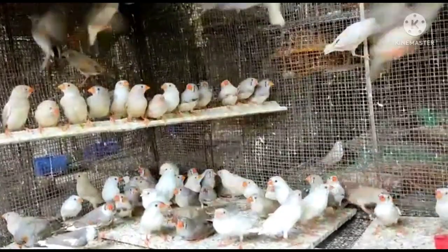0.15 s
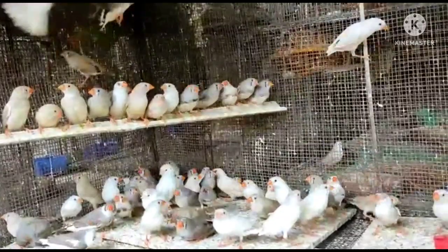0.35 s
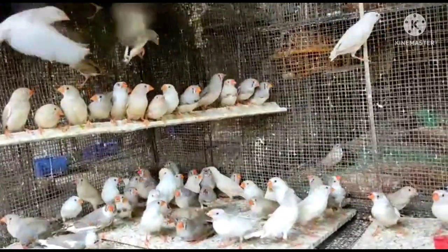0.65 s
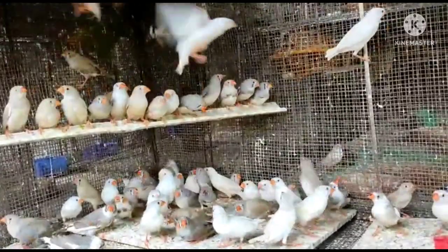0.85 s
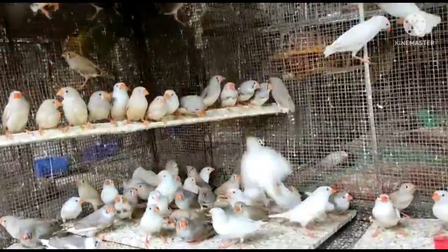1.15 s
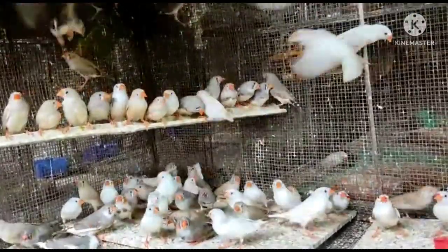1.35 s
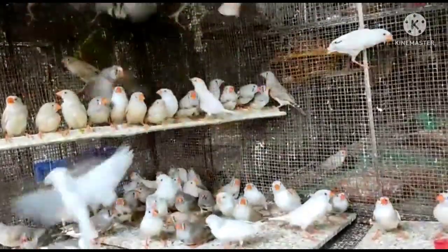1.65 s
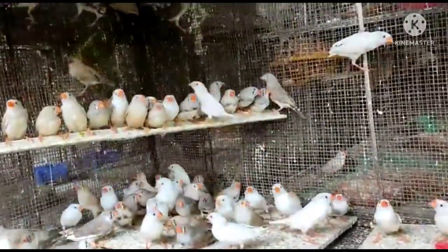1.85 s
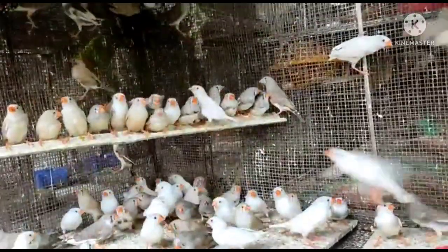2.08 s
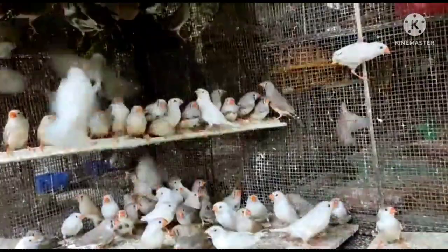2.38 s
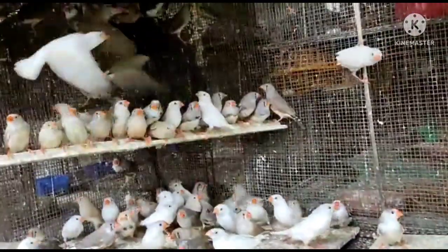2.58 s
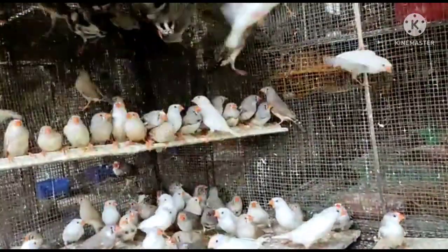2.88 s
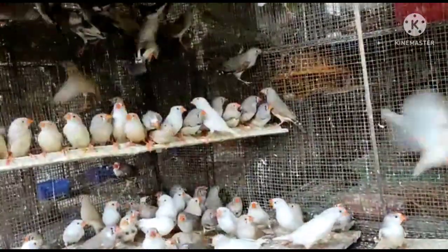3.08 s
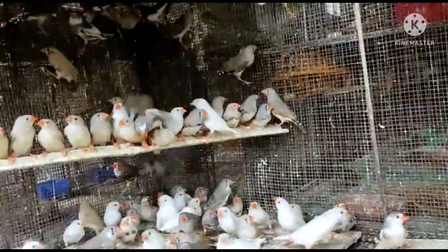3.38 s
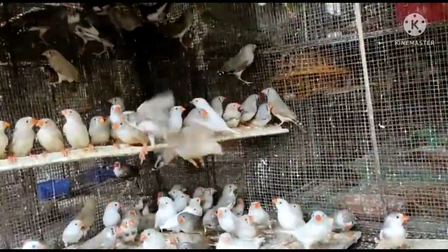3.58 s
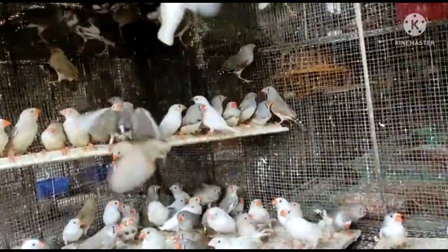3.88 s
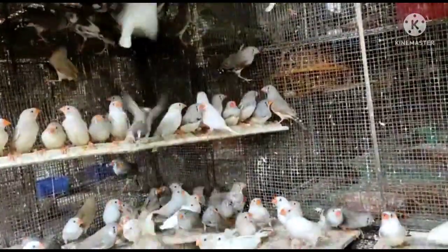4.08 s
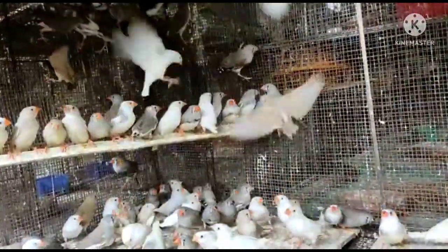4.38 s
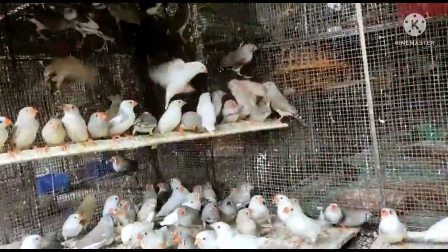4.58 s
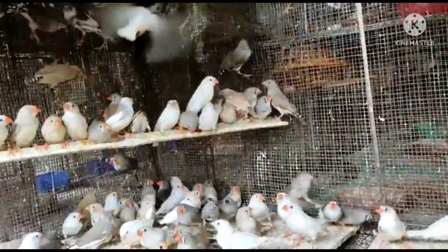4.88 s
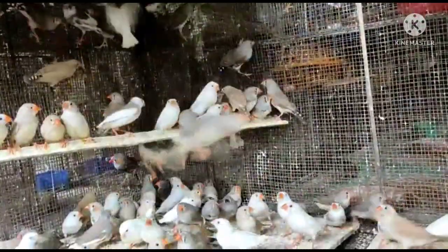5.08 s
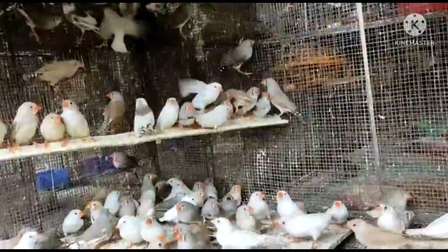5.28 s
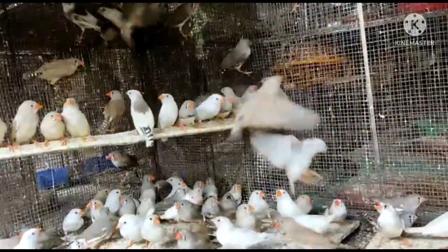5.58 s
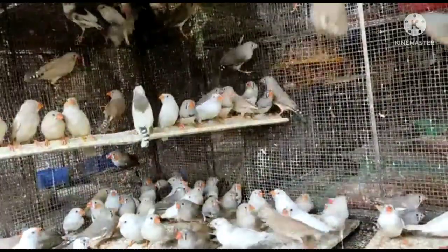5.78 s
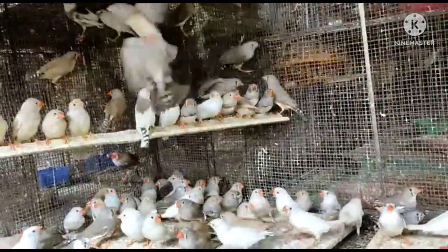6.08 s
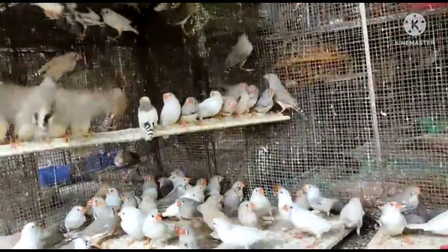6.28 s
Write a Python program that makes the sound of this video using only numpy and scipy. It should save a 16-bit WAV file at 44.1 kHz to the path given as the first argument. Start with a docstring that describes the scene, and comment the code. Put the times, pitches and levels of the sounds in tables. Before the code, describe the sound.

Dozens of zebra finches call at once in a crowded wire cage, their short nasal, raspy notes merging into a bright continuous wash. Closer birds stand out with gliding chirps and thin peeps, busiest after three seconds. One clear whistle dips and rises near 5.4 seconds. Soft perch knocks and faint mesh ringing lie underneath, with a low wavering hum. Stereo pickup a little way from the flock, with short hard-wall echoes.

```python
"""A big flock of zebra finches chatters in a crowded wire cage: nasal, raspy calls overlap into a dense wash.
Each call is a stack of harmonics shaped by a throat and a beak; short noise echoes give the hard walls' answer.
Nearer birds stand out with nasal calls, gliding chirps, thin peeps and one clear whistle.
Now and then a bird bumps a perch, heard as ringing tones; a wavering hum and filtered-noise rumble lie beneath."""
import sys
import numpy as np
from scipy import signal
from scipy.fft import rfft, irfft, next_fast_len
from scipy.io import wavfile
from scipy.ndimage import uniform_filter1d

SR = 44100
rng = np.random.default_rng(int(sys.argv[2]) if len(sys.argv) > 2 else 0)


def generate_wav(sig):
    """Save sig (samples, or channels by samples) to the path in sys.argv[1] as 16-bit PCM at SR."""
    pcm = np.round(np.clip(np.atleast_2d(sig).T, -1, 1) * 32767).astype(np.int16)
    wavfile.write(sys.argv[1], SR, pcm)


N = 284445  # length of the scene in samples
TOP_HZ = 14000  # highest frequency kept


def amp(db):
    """Turn decibels into a gain."""
    return 10 ** (np.asarray(db) / 20)


def unit(x):
    """Scale a sound to an average (rms) strength of 1."""
    return x / np.sqrt(np.mean(x ** 2) + 1e-20)


def along(points, hz):
    """Read a curve of (frequency, value) points, spaced as the ear hears pitch (log axis)."""
    point_hz, values = np.transpose(points)
    return np.interp(np.log(hz + 1), np.log(point_hz), values)


def over_time(rows):
    """Join (time, value) points with straight lines, one value per sample."""
    times, values = np.transpose(rows)
    return np.interp(np.arange(N) / SR, times, values)


def wobble(rate, size, count=256):
    """A random wandering curve with `rate` new values a second."""
    return np.interp(np.arange(size) * rate / SR, np.arange(count), rng.standard_normal(count))


def swells(rows, half_s):
    """A smooth bump in dB at each (time, dB) row; half_s [s] after its peak it is down to 37 %."""
    t = np.arange(N) / SR
    return sum(db * np.exp(-((t - s) / half_s) ** 2) for s, db in rows)


def filtered(x, response):
    """Make each frequency stronger or weaker by a gain curve."""
    m = next_fast_len(N + SR // 2)  # spare room so the end does not wrap onto the start
    gain = response(np.fft.rfftfreq(m, 1 / SR))
    return irfft(rfft(x, m) * gain, m)[..., :N]


def even(x, window=0.083):
    """A steady version of a sound, near rms 1: its slow swells are divided out."""
    power = uniform_filter1d(np.mean(x ** 2, axis=0), int(window * SR))
    return x / np.sqrt(np.abs(power) + 1e-12)


def sides(lean_db):
    """Left and right gains for a level difference (plus means louder on the left)."""
    return amp(np.array([[.5], [-.5]]) * lean_db)


def add(track, s, sound):
    """Mix a sound in at time s, cutting off whatever falls outside the track."""
    start = round(s * SR)
    part = sound[..., max(-start, 0):max(N - start, 0)]
    first = max(start, 0)
    track[..., first:first + part.shape[-1]] += part


def cage(x, wet_db, t60=0.25):
    """One spot in the cage: a direct path to each microphone, then that spot's own dense, fading echoes."""
    t = np.arange(SR // 5) / SR
    fading_noise = rng.standard_normal((2, len(t))) * amp(-60 * t / t60) * (t > .002)
    paths = amp(wet_db) * unit(fading_noise) / np.sqrt(len(t))
    paths[[0, 1], rng.integers(0, 20, 2)] += 1  # direct sound, arriving at slightly different times
    return signal.fftconvolve(x[None], paths, axes=1) / np.sqrt(1 + amp(wet_db) ** 2)


# how one bird's throat colours its voice: (frequency [Hz], gain [dB], added to each call's skirt level)
THROAT_COLOUR = [(600, -20), (1500, -1.5), (2200, 6), (6300, 1.5), (7500, 4.5), (9700, -7), (12000, 2),
                 (14000, -17)]


def syllable(length, pitch_hz, arch, beak_hz, glide, width_hz, rough, skirt_db, flutter_db, count=48):
    """One call: harmonics through throat and beak; pitch and beak resonance glide by the same ratio."""
    size = int(length * SR)
    u = np.linspace(0, 1, size)  # progress through the call
    jitter = wobble(900, size)  # roughens the pitch
    tremor = wobble(220, size)  # flutters the loudness
    slide = 1 + (glide - 1) * u
    bend = 1 + arch * (np.sin(np.pi * u) - np.pi / 4) + rough * jitter
    pitch = pitch_hz * slide * bend
    k = np.arange(1, min(TOP_HZ // pitch_hz, count) + 1, dtype=np.float32)[:, None]  # harmonic numbers
    # harmonics near the beak resonance are strongest; the throat sets a floor for the rest
    detune = (k * np.float32(pitch) - np.float32(beak_hz * slide)) / np.float32(width_hz)
    throat = np.float32(amp(skirt_db + along(THROAT_COLOUR, k * pitch_hz)))
    gain = 1 / (1 + detune ** 2) + throat
    start_phase = np.float32(rng.uniform(0, 2 * np.pi, (count, 1))[:len(k)])
    phase = k * np.float32(2 * np.pi * np.cumsum(pitch) / SR) + start_phase
    swell = np.sqrt(np.abs(np.sin(np.pi * u))) * amp(flutter_db * tremor)
    return unit(np.sum(gain * np.sin(phase), axis=0) * swell)


def nasal_call(pitch_hz=640, beak_hz=4300, length=.065, rough=0.0212, arch=.15):
    """The flock's everyday 'tet': each call has its own pitch, length, roughness and beak opening."""
    pitch, beak, glide, long, harsh, bend = np.exp(rng.standard_normal(6) * [.22, 0.29, .12, .3, 0.486, .5])
    return syllable(length * long, pitch_hz * pitch, arch * bend, beak_hz * beak, glide,
                    width_hz=420, rough=rough * harsh, skirt_db=-11.0, flutter_db=2.5)


def thin_call(pitch_hz=2400, length=.05):
    """A thin peep whose beak resonance favours the second or third harmonic."""
    pitch, long, glide = np.exp(rng.standard_normal(3) * [.16, .3, .06])
    beak_hz = pitch_hz * pitch * rng.uniform(1.73, 2.83)
    return syllable(length * long, pitch_hz * pitch, 0.0504, beak_hz, glide,
                    width_hz=400, rough=0.008, skirt_db=-13.5, flutter_db=4.5)


# how excited the whole flock is, before lulls and register gains: (time [s], level [dB])
FLOCK_LEVEL = [(0, -24), (.65, -24), (1.05, -24), (1.2, -27), (1.7, -25), (1.98, -24), (2.4, -24.5),
               (2.58, -25), (2.75, -24.5), (4.05, -24.5), (4.22, -23), (4.81, -23), (4.89, -26),
               (5.16, -25), (5.3, -24.5), (5.55, -26.5), (5.77, -24.5), (6.45, -24)]
# brief lulls in the chatter: (time [s], depth [dB], scaled up in the higher registers)
FLOCK_LULLS = [(.1, 2), (.92, 4), (1.21, 0), (1.57, 1), (1.75, 1), (2.59, 1), (3.29, 2.5), (3.91, 2),
               (4.95, 3.5), (5.18, 3), (5.51, 2), (5.65, 0.5), (6.25, 2)]
LULL_HALF_S = 0.036
# the colour of the massed voices, before the registers are levelled: (frequency [Hz], gain [dB])
FLOCK_COLOUR = [(600, -46), (1200, -16.5), (1600, -11.5), (1900, -6), (2200, -1.5), (3100, -3.3),
                (3900, -2), (4700, -2), (6200, -4.5), (7300, -9), (9700, -7.5), (11500, -6.5),
                (12700, -4.5), (14100, -17)]
BODY_DB, TREBLE_DB, OVERTONE_DB = 2.5, 1.65, -6.5  # balance of the chatter's three registers
TREBLE_GROWS, OVERTONE_GROWS = 1.13, 1.3  # dB for each dB of excitement


def flock(groups=21, calls=44, scatter_db=2.0):
    """Groups of birds all over the cage keep calling; excitement makes them louder and shriller."""
    chatter = np.zeros((2, N))
    for _ in range(groups):
        group = np.zeros(N)
        # one call at a random moment in each equal slice of time
        starts = (np.arange(calls) + rng.random(calls)) / calls * (N / SR + .1) - .1
        for s in starts:
            call = thin_call() if rng.random() < .16 else nasal_call()
            add(group, s, amp(scatter_db * rng.standard_normal()) * call)
        add(chatter, 0, cage(group, wet_db=3.5))
    chatter = filtered(chatter, lambda hz: amp(along(FLOCK_COLOUR, hz)))
    above_4500 = filtered(chatter, lambda hz: 1 / (1 + (4500 / (hz + 1)) ** 14))
    overtones = filtered(chatter, lambda hz: 1 / (1 + (7400 / (hz + 1)) ** 20))
    body, treble = chatter - above_4500, above_4500 - overtones
    level_db = over_time(FLOCK_LEVEL)
    mean_db = level_db.mean()
    excitement_db = level_db - mean_db - swells(FLOCK_LULLS, LULL_HALF_S)
    mix = amp(BODY_DB + excitement_db) * even(body)
    mix += amp(TREBLE_DB + TREBLE_GROWS * excitement_db) * even(treble)
    mix += amp(OVERTONE_DB + OVERTONE_GROWS * excitement_db) * even(overtones)
    return amp(mean_db) * mix


# shape of the rumble's spectrum, before its level is set: (frequency [Hz], relative level [dB per Hz])
RUMBLE_COLOUR = [(15, -3.5), (28, 7), (41, -6.5), (60, -2), (85, -2), (125, -8), (200, -16.5), (320, -17),
                 (700, -19), (1000, -18), (1500, -18.5), (4000, -23), (14000, -47)]
# how alike the rumble is on the two sides: (frequency [Hz], left-right likeness [0 to 1])
RUMBLE_LIKENESS = [(60, 0.88), (150, 0.87), (330, 0.8), (700, 0.36), (1400, 0)]


def rumble():
    """The low rumble of the surroundings: shaped noise, alike on both sides only in the bass."""
    def mid_and_side(hz):
        turn = np.arccos(np.clip(along(RUMBLE_LIKENESS, hz), -1, 1)) / 2
        return amp(along(RUMBLE_COLOUR, hz)) * [np.cos(turn), np.sin(turn)]
    mid, side = filtered(rng.standard_normal((2, N)), mid_and_side)
    level = amp(-41.5 + 0.6 * wobble(9.7, N))
    return level * unit(np.array([mid + side, mid - side]))


# moments when the hum swells: (time [s], rise [dB])
HUM_RISES = [(.33, 8), (.72, 9), (1.09, 12.5), (2.13, 9), (2.49, 10), (4.77, 6), (5.15, 7.5), (6.03, 5),
             (6.39, 7)]
HUM_SWELL_HALF_S = 0.092
HUM_HZ, HUM_START_DB, HUM_GROWTH_DB_PER_S, HUM_WAVER_DB = 64.5, -54.5, 1.57, 4.8


def hum():
    """A low tone of unsteady pitch and loudness that slowly grows."""
    pitch = HUM_HZ + 3.5 * wobble(14, N)
    tone = unit(np.sin(2 * np.pi * np.cumsum(pitch) / SR))
    level_db = HUM_START_DB + HUM_GROWTH_DB_PER_S * np.arange(N) / SR
    level_db = level_db + swells(HUM_RISES, HUM_SWELL_HALF_S) + HUM_WAVER_DB * wobble(10, N)
    return amp(level_db) * tone


NEAR_DB, NEAR_TYPICAL_DB = 1, -25  # gain on every close caller; the table level that gets the usual echo
NEAR_WET_DB, NEAR_DRIER = -3.5, .5  # usual echo level; dB less echo for each dB louder


def nearby(call, db, lean_db):
    """Place a single caller: the louder it is, the closer and drier."""
    wet_db = NEAR_WET_DB - NEAR_DRIER * (db - NEAR_TYPICAL_DB)
    return amp(db + NEAR_DB) * sides(lean_db) * cage(call, wet_db)


# raspy, gliding calls: (time [s], length [s], beak resonance from [Hz], to [Hz],
# level before the close-caller gain [dB], left-right difference before the overall lean [dB])
NEAR_CHIRPS = [(.114, 0.063, 4880, 4600, -30, 4), (.378, 0.047, 4760, 4400, -25, -8),
               (0.596, 0.047, 4640, 5140, -21.5, 1), (0.728, 0.058, 3460, 3270, -28.5, -1),
               (1.248, 0.097, 3976, 4450, -29, -4), (1.418, 0.07, 3740, 4230, -23.5, -2),
               (1.774, 0.059, 5880, 6170, -27.5, -4), (1.898, 0.053, 4610, 3440, -23, -4),
               (1.957, 0.11, 4370, 5510, -25, -2), (2.039, 0.032, 4050, 3730, -27.5, -14),
               (2.324, .115, 4064, 5400, -24.5, -2), (2.369, 0.031, 4580, 4350, -23, -7),
               (2.465, 0.05, 4520, 4470, -27, 4), (2.986, 0.041, 3970, 3850, -27, 0),
               (3.168, 0.063, 4780, 5530, -22.5, 5), (3.394, 0.022, 5780, 6380, -21.5, 16),
               (3.721, 0.15, 4670, 5450, -24, 0), (3.785, 0.07, 6010, 5780, -26.5, 0),
               (3.96, .045, 5470, 5710, -24.5, -4), (4.164, 0.092, 4630, 5040, -24, 5),
               (4.264, 0.04, 5340, 6420, -21.5, -8), (4.327, 0.08, 4120, 4220, -24, 1),
               (4.574, 0.095, 4970, 5560, -23.5, -2), (4.692, 0.07, 5610, 5470, -28, -9),
               (4.714, 0.098, 4410, 4020, -24, -2), (5.114, 0.073, 5170, 5880, -25.5, -4),
               (5.363, .03, 3965, 3690, -19.5, -2), (5.395, .025, 4300, 5740, -21, 1),
               (5.678, 0.029, 5370, 5740, -23, 2), (5.683, 0.052, 4835, 5010, -21.5, -2),
               (5.702, 0.043, 3890, 3015, -26.5, -4)]


def near_chirps():
    """Raspy chirps whose pitch and beak resonance glide together."""
    out = np.zeros((2, N))
    for s, length, from_hz, to_hz, db, lean_db in NEAR_CHIRPS:
        pitch_hz = from_hz / rng.integers(6, 10)  # the beak is tuned to one harmonic
        call = syllable(length, pitch_hz, 0.027, from_hz, to_hz / from_hz,
                        width_hz=410, rough=0.0353, skirt_db=-27.5, flutter_db=2)
        add(out, s, nearby(call, db, lean_db))
    return out


# nasal calls from nearer birds: (time [s], length [s], beak resonance [Hz],
# level before the close-caller gain and the low cut [dB])
NEAR_TETS = [(0.133, .08, 5000, -26), (0.749, 0.07, 3220, -39), (0.984, 0.075, 4400, -28),
             (2.02, .06, 4900, -28), (2.372, 0.092, 4800, -26.5), (2.801, 0.086, 6000, -26),
             (2.976, 0.045, 4200, -24), (3.39, 0.056, 5440, -28), (3.767, 0.058, 5200, -28),
             (3.97, .08, 6000, -34), (4.22, 0.074, 4600, -24.5), (4.39, 0.046, 5000, -26),
             (5.26, .07, 4000, -38), (5.36, 0.038, 3420, -26), (5.553, .06, 4700, -28),
             (5.7, 0.066, 3000, -25), (5.858, 0.057, 4500, -28)]


def near_nasal_calls():
    """Nasal 'tets' with a low pitch but weak low harmonics."""
    out = np.zeros((2, N))
    for s, length, beak_hz, db in NEAR_TETS:
        pitch_hz = 646.5 * np.exp(.12 * rng.standard_normal())
        call = syllable(length, pitch_hz, 0.125, beak_hz, glide=1,
                        width_hz=350, rough=0.03, skirt_db=-4.5, flutter_db=3.5)
        add(out, s, nearby(call, db, 0))
    # so small a throat radiates hardly any low harmonics
    return filtered(out, lambda hz: 1 / (1 + (1850 / (hz + 1)) ** 8))


# thin, clear notes: (time [s], length [s], pitch [Hz], beak resonance [Hz], other harmonics before throat
# colour [dB], level before the close-caller gain [dB], left-right difference before the overall lean [dB])
NEAR_PEEPS = [(0.177, 0.032, 2110, 6380, -20, -24.5, -2), (0.528, .088, 2182, 4400, -3, -27.5, -8),
              (1.099, .042, 2090, 4300, -22, -24.5, 8), (1.621, 0.065, 2040, 4130, -20, -28, 2),
              (1.82, 0.062, 2115, 6450, -27, -28.5, -5), (2.245, 0.045, 2260, 4520, -20, -21.5, 0),
              (2.675, 0.068, 2370, 4800, -26, -30, -7), (3.327, 0.067, 2275, 4550, -4, -17.5, -2),
              (3.498, 0.052, 2100, 6360, -43, -20, -1), (3.507, 0.063, 2800, 5460, -20, -20, 1),
              (3.559, 0.027, 2330, 4680, -20, -19.5, -2), (3.575, 0.032, 2160, 6400, -25, -27, -3),
              (3.86, 0.059, 2805, 2800, -21, -23, 0), (3.948, 0.044, 2350, 4760, -15, -23, 6),
              (3.982, 0.062, 2090, 6390, -25, -25, -4), (4.483, .057, 2950, 5900, -18, -28, 0),
              (4.505, 0.033, 1763, 3520, -21, -24, 8), (4.824, 0.028, 2050, 6210, -17, -26, -3),
              (5.072, 0.056, 2284, 2260, -12, -30, -2), (5.234, 0.045, 2223, 6630, -13, -26, -7),
              (5.273, 0.052, 2180, 4400, -24, -26.5, -3), (5.39, 0.017, 2080, 6270, -28, -18.5, -7.5),
              (5.535, 0.052, 2250, 4780, -18, -23, 1), (5.592, 0.041, 2180, 6500, -28, -22.5, -4),
              (5.741, 0.064, 2134, 6220, -18, -23, 7), (5.996, 0.047, 2295, 4550, -11, -23, 2),
              (6.036, 0.037, 2135, 6270, -24, -22, -6), (6.078, 0.035, 2300, 4500, -19, -37, -2)]


def near_peeps():
    """Thin peeps: almost steady notes with the harmonics nearest the beak resonance standing out."""
    out = np.zeros((2, N))
    for s, length, pitch_hz, beak_hz, skirt_db, db, lean_db in NEAR_PEEPS:
        call = syllable(length, pitch_hz, 0.032, beak_hz, glide=0.99,
                        width_hz=210, rough=0.01, skirt_db=skirt_db, flutter_db=1.0)
        add(out, s, nearby(call, db, lean_db))
    return out


def ring(modes):
    """A soft blow rings each tone at a new strength, a little unsteadily, for at most one second."""
    t = np.arange(SR) / SR
    total = np.zeros(SR)
    for hz, db, t60 in modes:
        fade = amp(db + rng.normal(0, 3.0) - 60 * t / t60)
        total += fade * np.sin(2 * np.pi * hz * t + 1.95 * wobble(47.7, len(t)))
    return total * (1 - np.exp(-t / 0.0017))  # soft start


# birds land and shake the cage: (time [s], gain on the perch knock [dB], gain on the mesh ring [dB])
LANDINGS = [(.881, -51, -43), (1.43, -56, -58), (2.746, -63, -53), (2.901, -56, -53), (5.091, -58, -53),
            (5.322, -47, -62), (5.949, -55, -54)]
# tones of the perch: (frequency [Hz], typical strength before the gain [dB], time to fade by 60 dB [s])
PERCH_TONES = [(336, -7, .08), (462, 12.5, 0.055), (565, 2, 0.1), (870, 5, 0.12), (953, 6, 0.2),
               (1010, 8, 0.064)]
# tones of the wire mesh: (frequency [Hz], typical strength before the gain [dB], time to fade by 60 dB [s])
MESH_TONES = [(286, -16, 1.0), (309.5, -2, 1.5), (335, 2.5, 0.48), (439, -7, .4), (552, -8, 0.41),
              (628, -4, 0.53), (733, -11, 0.79)]


def bumps():
    """A landing knocks the perch, and the wire mesh rings on."""
    out = np.zeros((2, N))
    for s, knock_db, mesh_db in LANDINGS:
        knock = amp(knock_db) * ring(PERCH_TONES)
        mesh = amp(mesh_db) * ring(MESH_TONES)
        add(out, s, cage(knock + mesh, wet_db=-17))
    return out


WHISTLE_AT_S, WHISTLE_LENGTH_S = 5.410, .048
WHISTLE_HZ, WHISTLE_DIP_HZ = 5500, 890
WHISTLE_DB, WHISTLE_SWELL_DB, WHISTLE_ECHO_DB = -19.5, 6, -2


def whistle():
    """One bird close by: a nearly pure tone dips and rises, trembling, loudest around the bottom of its dip."""
    size = int(WHISTLE_LENGTH_S * SR)
    arch = np.abs(np.sin(np.linspace(0, np.pi, size)))
    pitch = (WHISTLE_HZ - WHISTLE_DIP_HZ * arch ** 4) * (1 + .008 * wobble(970, size))
    swell = np.sqrt(arch) * amp(WHISTLE_DB + WHISTLE_SWELL_DB * arch ** 2 + 2 * wobble(430, size))
    tone = swell * np.sin(2 * np.pi * np.cumsum(pitch) / SR)
    out = np.zeros((2, N))
    add(out, WHISTLE_AT_S, tone)  # the same on both sides: straight ahead
    add(out, WHISTLE_AT_S, amp(WHISTLE_ECHO_DB) * cage(tone, wet_db=10))
    return out


# overall lean of the birds' sound to one side: (frequency [Hz], left-right difference [dB])
BIRD_LEAN = [(1000, 3), (1700, 1.5), (2300, 2.5), (3200, -1.5), (4500, -4), (6200, -3), (8000, 5),
             (10000, 1), (12500, -1.5)]


def scene():
    """The birds reach the two microphones with different colours; bumps, rumble and hum join them."""
    near_birds = near_chirps() + near_nasal_calls() + near_peeps()
    birds = flock() + near_birds + whistle()
    birds = filtered(birds, lambda hz: sides(along(BIRD_LEAN, hz)))
    return birds + bumps() + rumble() + hum()


def record(dry):
    """The recorder keeps nothing above its band limit."""
    return filtered(dry, lambda hz: hz < TOP_HZ)


dry = scene()
out = record(dry)
generate_wav(out)
```